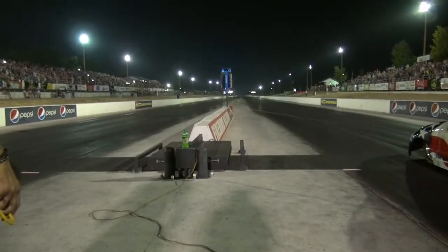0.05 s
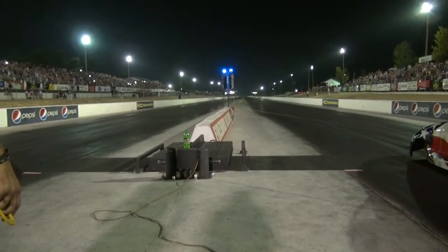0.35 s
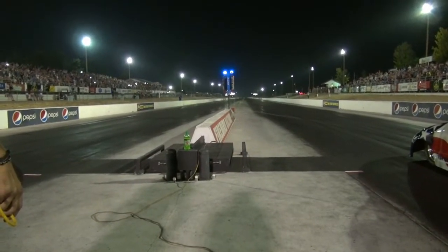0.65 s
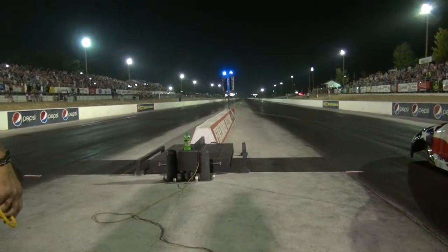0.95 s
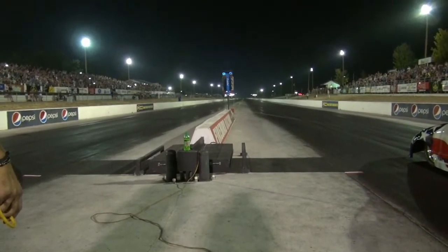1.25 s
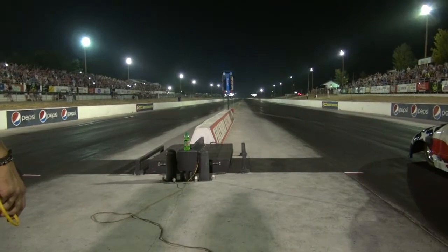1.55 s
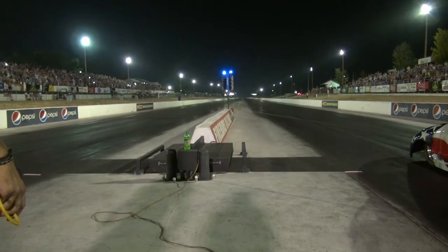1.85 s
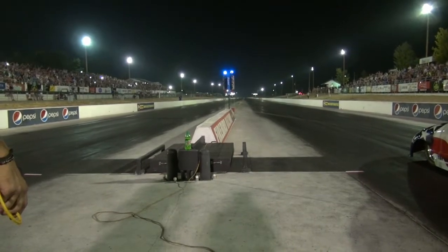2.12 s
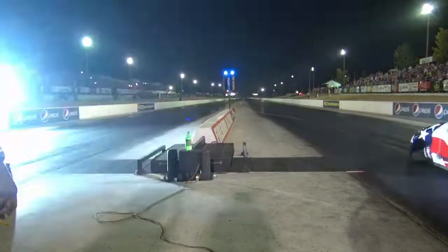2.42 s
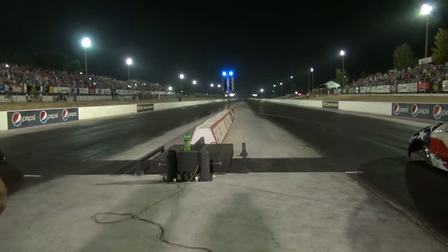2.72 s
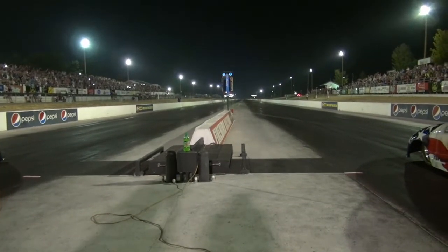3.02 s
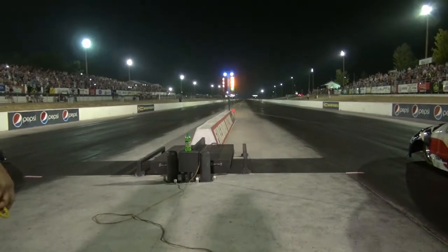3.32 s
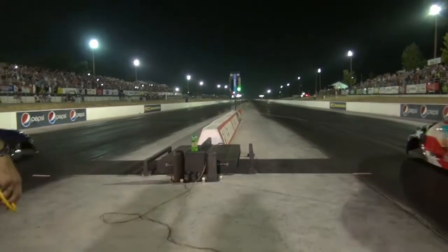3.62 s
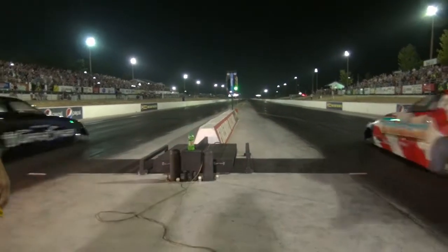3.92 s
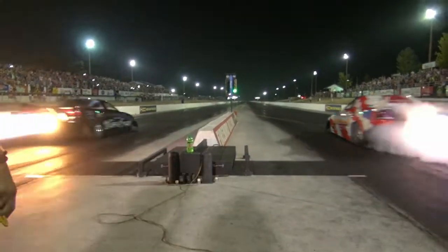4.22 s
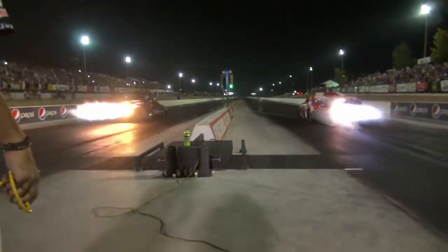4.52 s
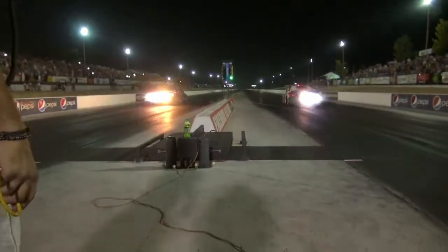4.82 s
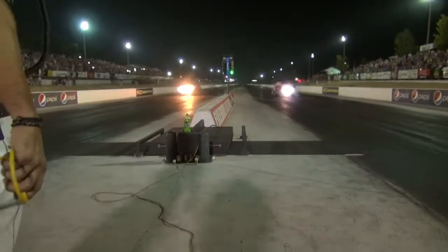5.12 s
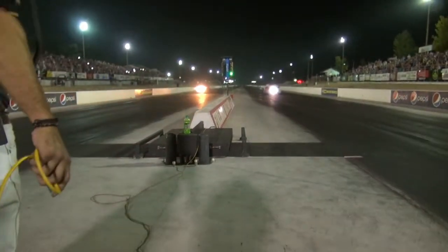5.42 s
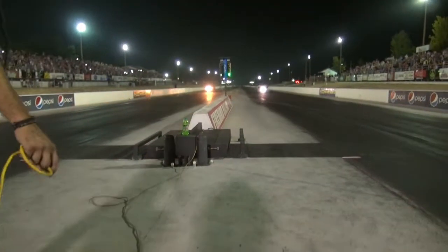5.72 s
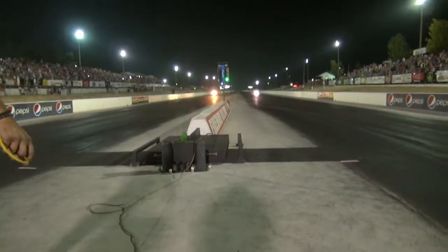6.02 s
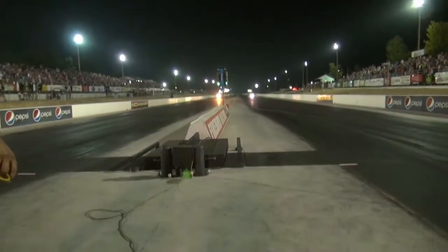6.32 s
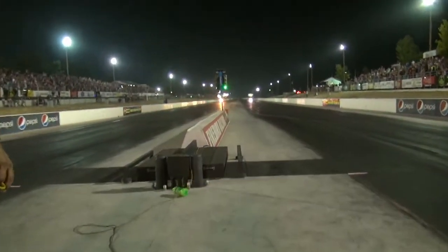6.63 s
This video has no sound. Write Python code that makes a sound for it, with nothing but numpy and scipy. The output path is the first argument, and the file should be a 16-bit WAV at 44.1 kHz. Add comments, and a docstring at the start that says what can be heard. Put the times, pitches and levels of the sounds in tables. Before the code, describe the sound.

Two jet cars roar at the start line, pop and hiss past, then race away with a loud crackle and deep rumble.

```python
"""A drag strip, with a stereo camera microphone between the lanes, under 5 m from each of two jet cars.
They wait with a bright roar of turbulent exhaust, light their afterburners and race away.
The nozzles hiss as they pass; from behind come a crackle of shock waves, a hollow-ringing roar and the
rumble of big eddies, which takes over with distance. The camera booms in the din and rounds off peaks."""
import sys
import numpy as np
from scipy import signal
from scipy.fft import rfft, irfft, next_fast_len
from scipy.io import wavfile
from scipy.ndimage import uniform_filter1d, map_coordinates

SR = 44100
rng = np.random.default_rng(int(sys.argv[2]) if len(sys.argv) > 2 else 0)


def transcribe(u):
    """Save the signal u as a 16-bit wav file named by the first command-line argument.

    u: samples, shape (n,) or (channels, n), limited to [-1, 1]; the rate is SR.
    q: integer samples, one column per channel.
    """
    v = np.clip(np.atleast_2d(u).T, -1, 1)
    q = np.round(v * 32767).astype(np.int16)
    wavfile.write(sys.argv[1], SR, q)


N = 298116
TIME = np.arange(N) / SR

LAUNCH_S, LEAP_S, ACCEL_M_PER_S2 = 3.505, 0.035, 19.3  # both cars leave together
LANE_M, BEHIND_M = 4.67, 2.9  # the nozzles start this far beside and behind the microphone
# narrow bands that colour the roar and crackle: f/Hz, width/Hz, gain/dB
RESONANCES = [(930, 91, -1.5), (1460, 150, -0.5), (1725, 90, 3)]


def amp(db):
    """Decibels to gain."""
    return 10 ** (np.asarray(db) / 20)


def unit(x):
    """Scale to rms 1."""
    return x / np.sqrt(np.mean(x ** 2) + 1e-20)


def along(points, hz):
    """Interpolate (f/Hz, value) points on a log frequency axis."""
    f, values = np.transpose(points)
    return np.interp(np.log(hz + 1), np.log(f + 1), values)


def ramp(start_s, end_s):
    """Rises from 0 to 1 between two times."""
    return np.clip((TIME - start_s) / max(end_s - start_s, 1e-3), 0, 1)


def swell(at_s, half_s):
    """A smooth bump of height 1 around a moment."""
    return np.exp(-((TIME - at_s) / half_s) ** 2)


def wobble(rate):
    """A smooth random curve, rate knots a second."""
    knots = rng.standard_normal(int(N * rate / SR) + 4)
    return map_coordinates(knots, [TIME * rate], mode="nearest")


def filtered(x, response):
    """Apply a gain that depends on frequency."""
    size = next_fast_len(N + 8192)
    return irfft(rfft(x, size) * response(np.fft.rfftfreq(size, 1 / SR)), size)[..., :N]


def reshaped(x, gain_db):
    """Apply a gain in dB that depends on frequency and time."""
    hz, t, spectra = signal.stft(x, SR, nperseg=512)
    return signal.istft(spectra * amp(gain_db(hz[:, None], t)), SR, nperseg=512)[1][:N]


def coloured(x, spectrum, bands=()):
    """Give x a broad spectrum with narrow humps and dips, at rms 1."""
    def humps_db(hz):
        return sum(db * np.exp(-2 * ((hz - centre) / width) ** 2) for centre, width, db in bands)
    return unit(filtered(x, lambda hz: amp(along(spectrum, hz) + humps_db(hz))))


def turbulence(rate, depth_db):
    """White noise that comes in puffs, one for each eddy."""
    return unit(rng.standard_normal(N) * amp(depth_db * wobble(rate)))


def nozzles():
    """The microphone's distance/m and angle/degrees off the exhaust axis, held until the nozzles pass."""
    running_s = np.maximum(TIME - LAUNCH_S, 0)
    ahead_m = np.maximum(0.5 * ACCEL_M_PER_S2 * running_s ** 2 - BEHIND_M, 0)
    return np.hypot(ahead_m, LANE_M), np.degrees(np.arctan2(LANE_M, ahead_m))


def inside(cone_deg, angle, steepness=7):
    """0 beside a cone of sound with this half-angle, 1 within it."""
    return 1 / (1 + (angle / cone_deg) ** steepness)


def beamed_db(beside_db, cone_db, cone_deg, doubling_db):
    """Level of a sound beamed backwards: it shifts within its cone and with each doubling of distance."""
    distance, angle = nozzles()
    return beside_db + cone_db * inside(cone_deg, angle) + doubling_db * np.log2(distance / LANE_M)


def side_on():
    """1 while the nozzles sweep past the microphone, else 0."""
    return ramp(LAUNCH_S, LAUNCH_S + LEAP_S) * (1 - ramp(3.9, 4.15))


def swells_and_dips():
    """Brief swells and dips in the roar, rumble and boom, in dB."""
    # swells and dips: t/s, half-length/s, roar/dB, rumble/dB, boom/dB
    surges = [(4.25, 0.34, -0.5, 7.5, 0.8), (5.223, 0.033, -4.5, -1, 14), (5.293, 0.047, 1.5, 2, 5),
              (5.537, 0.031, 2.5, -7, -2), (6.283, 0.021, -3, 0, -7), (6.403, 0.014, 8, 5, -1),
              (6.5, 0.014, 6, 3, 5), (6.72, 0.17, 0.5, 4, -7)]
    return sum(np.outer(gains_db, swell(at_s, half_s)) for at_s, half_s, *gains_db in surges)


def through_air(x, pivot_hz=2500):
    """Air takes treble with distance, tilting the spectrum; near the exhaust axis it is duller still."""
    distance, angle = nozzles()
    db_per_10khz = -16 * (np.abs(distance - LANE_M) / 100) ** 0.71 - 4 * inside(10.5, angle)
    return reshaped(x, lambda hz, t: np.interp(t, TIME, db_per_10khz) * (hz - pivot_hz) / 10000)


def through_hot_air(x, depth_db):
    """Hot, stirred air makes patches of the spectrum swell and fade."""
    def patches_db(hz, t):
        field = rng.standard_normal((len(hz), len(t)))
        bands = uniform_filter1d(field, size=3, axis=0)
        return depth_db * unit(uniform_filter1d(bands, size=45, axis=1))
    return reshaped(x, patches_db)


def microphones(x):
    """Two close ports hear nearly the same thing, the left one more weakly."""
    # agreement of the ports: f/Hz, likeness/0-1
    agreement = [(150, 0.97), (400, 0.92), (900, 0.99), (4000, 1), (9000, 0.98), (14000, .9)]
    # balance of the ports: f/Hz, left minus right/dB
    balance = [(150, -5.5), (400, -4), (3000, -4.5), (8000, -4), (14000, -3.5)]
    diffuse = signal.fftconvolve(x, rng.standard_normal(512) / np.sqrt(512))[:N]
    side = filtered(diffuse, lambda hz: np.sqrt((1 - along(agreement, hz)) / (1 + along(agreement, hz))))
    gains = lambda hz: 2 / (1 + amp(np.outer([-1, 1], along(balance, hz))))
    return filtered(np.array([x + side, x - side]), gains)


def port_pair(spectrum, likeness):
    """Noise on two microphone ports that agree only in part; their mean has rms 1."""
    mid, side = [coloured(noise, spectrum) for noise in rng.standard_normal((2, N))]
    side = side * np.sqrt((1 - likeness) / (1 + likeness))
    return np.array([mid + side, mid - side])


def shaken_camera(surge_db, side_on_db=-6):
    """The din makes the camera boom on its mount and buffets its ports, more so in the jet wash."""
    # boom of the mount: f/Hz, level/dB
    boom_spectrum = [(20, -50), (58, -18), (80, -2.5), (100, 3), (118, 2), (140, -4.5), (250, -27),
                     (1000, -120)]
    # buffeting at the ports: f/Hz, level/dB
    buffet_spectrum = [(10, -3), (25, 7), (40, 16), (60, -3), (110, -38), (600, -120)]
    wash = swell(at_s=6.3, half_s=0.3)
    boom_db = beamed_db(beside_db=-51, cone_db=7.5, cone_deg=8.5, doubling_db=3.5) + 2 * wash + surge_db
    buffet_db = beamed_db(beside_db=-63, cone_db=2, cone_deg=11, doubling_db=3.8) + 7 * wash
    boom = port_pair(boom_spectrum, likeness=0.4) * amp(boom_db) * amp([[0.8], [-1.1]])
    buffet = port_pair(buffet_spectrum, likeness=-0.3) * amp(buffet_db)
    return (boom + buffet) * amp(side_on_db * side_on())


def waiting_jets(level_db=-14.5, flutter_db=0.5, rasp_hz=3500, rasp_width_hz=1800):
    """Steady mixing noise, heard from ahead of the nozzles until the cars leap forward."""
    # the jets from ahead: f/Hz, level/dB
    spectrum = [(65, -52), (110, -27), (133, -23.5), (160, -18), (323, -11), (577, -7.5), (968, -2),
                (1320, -8.5), (1630, -1.5), (2040, -1.5), (3800, -7), (6930, -13.5), (12900, -28.5),
                (15500, -35)]
    # bands that reflections at the start line lift or cut: f/Hz, width/Hz, gain/dB
    reflections = [(890, 180, 0), (1190, 80, 4), (1334, 180, 4), (1586, 55, 3), (1880, 60, 1),
                   (3300, 240, -0.5), (3830, 370, 2), (4570, 37, 5.5)]
    roar = coloured(turbulence(rate=250, depth_db=-0.26), spectrum, reflections)
    rasp_db = lambda hz, t: (-0.5 + 0.04 * t) * np.exp(-((hz - rasp_hz) / rasp_width_hz) ** 2)
    roar = through_hot_air(reshaped(roar, rasp_db), depth_db=0.97)
    sag_db = -1.34 * ramp(0.46, 0.53) * (1 - ramp(0.53, 1.34))  # the level dips once and creeps back
    waiting = np.sqrt(1 - ramp(LAUNCH_S, LAUNCH_S + LEAP_S))
    return roar * amp(level_db + sag_db + flutter_db * wobble(35.33)) * waiting


def passing_jets(level_db=-16):
    """Side-on, the finest eddies next to the nozzles hiss and the low roar is beamed away."""
    # the jets from the side: f/Hz, level/dB
    spectrum = [(65, -61), (110, -26), (141, -20.5), (710, -10), (891, -7), (1070, -9), (1190, -6),
                (1350, -7.5), (1800, -1.5), (1920, -3.5), (3900, -4), (6650, -8), (15500, -24.5)]
    return coloured(rng.standard_normal(N), spectrum) * amp(level_db) * np.sqrt(side_on())


def light_afterburners(roar, width_s=0.0012):
    """Each afterburner lights with one soft swing of pressure that ducks the roar for an instant."""
    # ignitions: t/s, pop level/dB, dip in the roar/0-1
    ignitions = [(3.433, -20, 0.2), (3.509, -27, 0.1)]
    for at_s, pop_db, dip in ignitions:
        offset = (TIME - at_s) / width_s
        bell = np.exp(-offset ** 2 / 2)
        pop = amp(pop_db) * (1 - offset ** 2) * bell
        roar = roar * (1 - dip * bell) + pop
    return roar


def flame_roar(surge_db):
    """The turbulent flames roar in puffs, beamed backwards in a wide cone."""
    # the flames from behind: f/Hz, level/dB
    spectrum = [(40, -60), (180, -24), (380, -11), (600, -1.5), (850, -0.5), (1000, -6.5), (1500, -10.5),
                (3000, -40), (8000, -120)]
    level_db = beamed_db(beside_db=-24, cone_db=10.5, cone_deg=26, doubling_db=-3) + surge_db
    return coloured(turbulence(rate=83, depth_db=1.65), spectrum, RESONANCES) * amp(level_db)


def hollow_ring(surge_db):
    """A hollow resonance near 810 Hz in the receding roar; it fades, then comes back far down the track."""
    # the resonance: f/Hz, level/dB
    spectrum = [(400, -60), (690, -16), (760, -2.5), (820, 0), (865, -4), (915, -20), (1600, -60),
                (5000, -120)]
    level_db = beamed_db(beside_db=-35, cone_db=26, cone_deg=20.5, doubling_db=-6) + surge_db
    return_db = 7 * ramp(6, 7.2)
    return coloured(rng.standard_normal(N), spectrum) * amp(level_db + return_db)


def eddy_rumble(surge_db):
    """Big eddies downstream make a deep rumble that carries far."""
    # the big eddies: f/Hz, level/dB
    spectrum = [(40, -45), (95, -39), (145, -2), (215, 2.5), (340, -0.5), (500, -2.5), (1000, -48),
                (4000, -120)]
    level_db = beamed_db(beside_db=-38, cone_db=15, cone_deg=21, doubling_db=-1.17) + surge_db
    return coloured(rng.standard_normal(N), spectrum) * amp(level_db)


def shock_crackle(shocks_per_s=3500, scatter_db=2.0):
    """Supersonic eddies fire clusters of shocks, more distinct as the jets point at the microphone."""
    # the shock fronts: f/Hz, level/dB
    spectrum = [(40, -75), (250, -12), (700, -4.5), (1100, -1), (2100, -0.5), (3200, -3.5), (6500, -10),
                (10000, -20), (13500, -25), (16000, -34)]
    on_axis = 0.33 + 0.57 * ramp(4.7, 5.3)
    struck = rng.random(N) < shocks_per_s / SR
    fronts = struck * amp(scatter_db * rng.standard_normal(N))
    shocks = np.sqrt(on_axis) * unit(fronts - fronts.mean())
    hiss = np.sqrt(1 - on_axis) * rng.standard_normal(N)
    clusters = amp(on_axis * (1.77 * wobble(330) + 1.1 * wobble(55) + 0.6 * wobble(12)))
    crackle = through_air(coloured((shocks + hiss) * clusters, spectrum, RESONANCES))
    level_db = beamed_db(beside_db=-13.5, cone_db=-6.8, cone_deg=13, doubling_db=-1.18)
    lull_db = -2.5 * swell(at_s=6.39, half_s=0.11)
    return crackle * amp(level_db + lull_db)


def scene():
    """The launch from between the lanes: the jets from ahead, side-on, then from behind."""
    roar_db, rumble_db, boom_db = swells_and_dips()
    start_line = light_afterburners(waiting_jets() + passing_jets())
    exhausts = flame_roar(roar_db) + hollow_ring(roar_db) + eddy_rumble(rumble_db) + shock_crackle()
    in_view = np.sqrt(ramp(3.886, 4.22))
    return microphones(start_line + exhausts * in_view) + shaken_camera(boom_db)


def record(dry, ceiling=0.8, top_hz=15720):
    """The camera rounds off the highest peaks and keeps nothing above its band limit."""
    rounded = dry / (1 + np.abs(dry / ceiling) ** 6) ** (1 / 6)
    return filtered(rounded, lambda hz: hz < top_hz)


dry = scene()
out = record(dry)
transcribe(out)
```